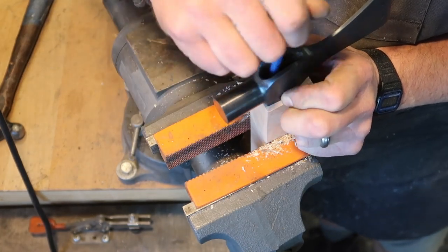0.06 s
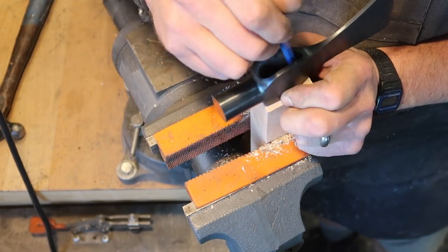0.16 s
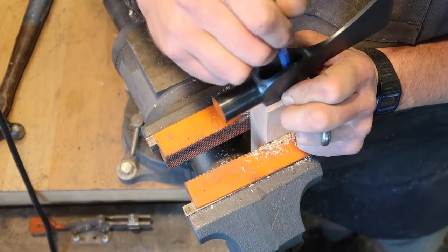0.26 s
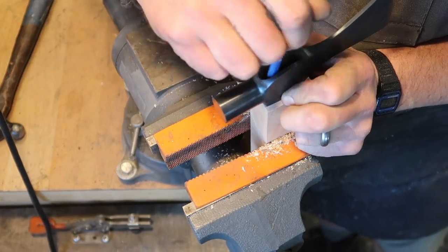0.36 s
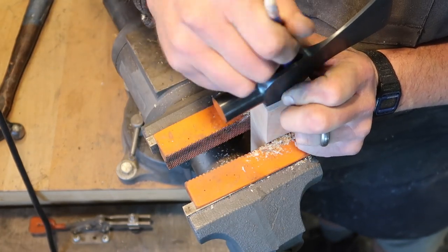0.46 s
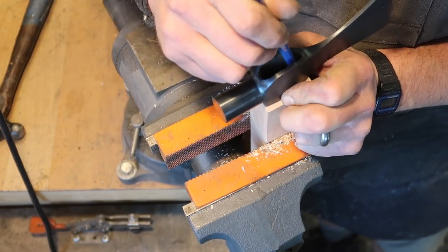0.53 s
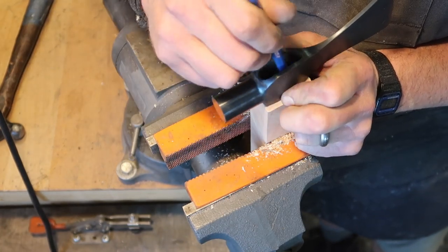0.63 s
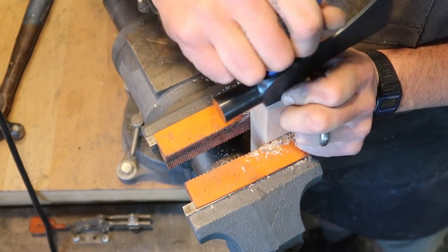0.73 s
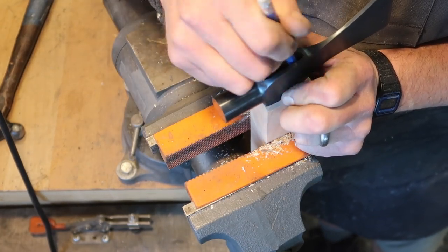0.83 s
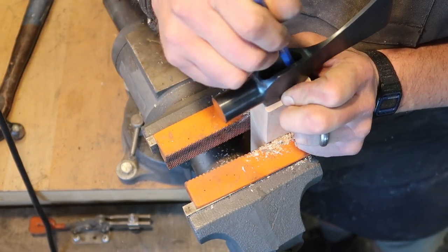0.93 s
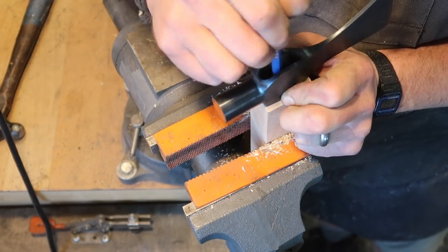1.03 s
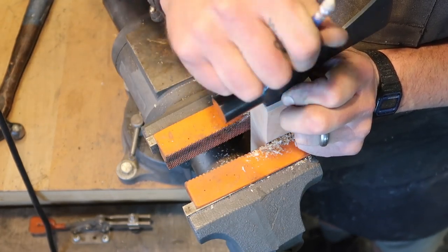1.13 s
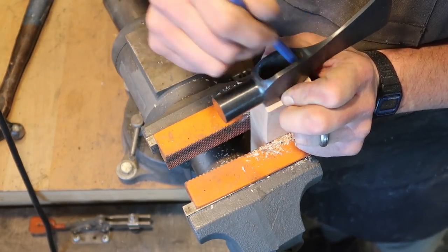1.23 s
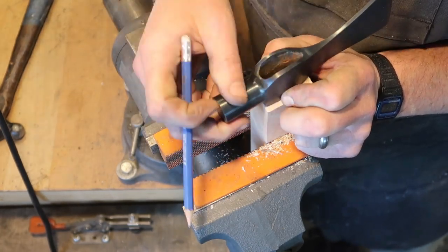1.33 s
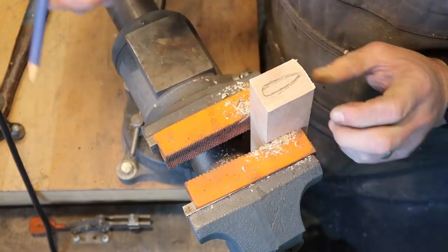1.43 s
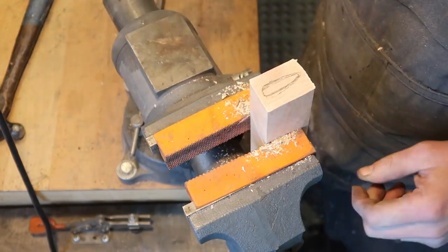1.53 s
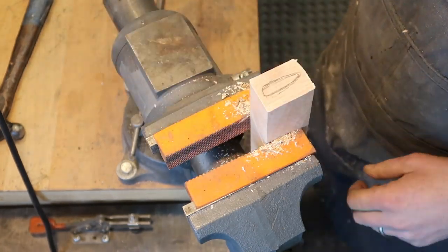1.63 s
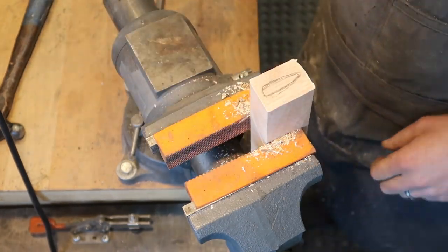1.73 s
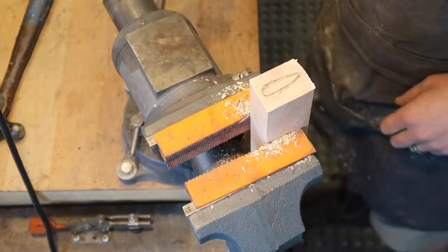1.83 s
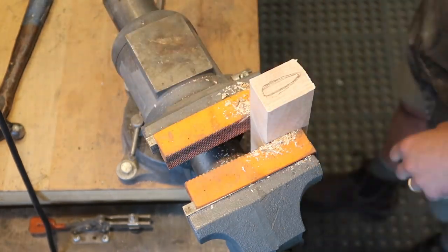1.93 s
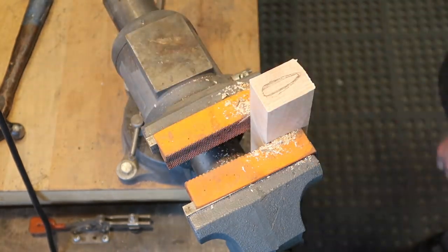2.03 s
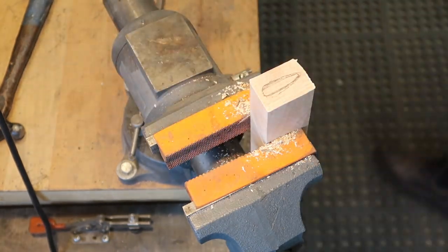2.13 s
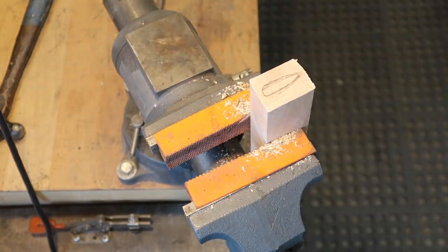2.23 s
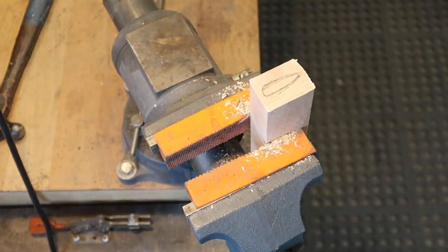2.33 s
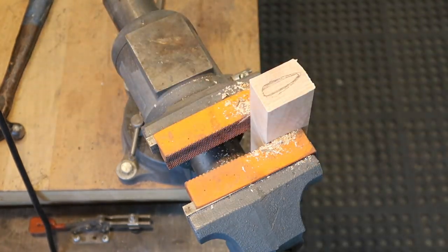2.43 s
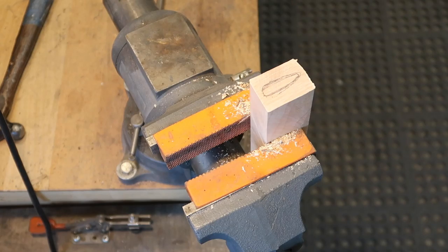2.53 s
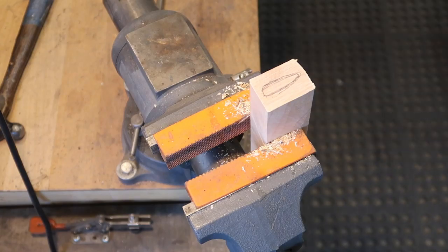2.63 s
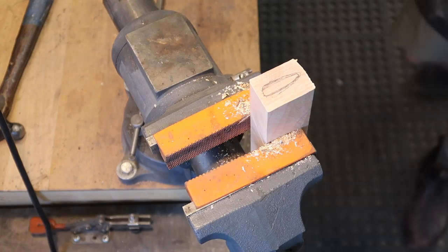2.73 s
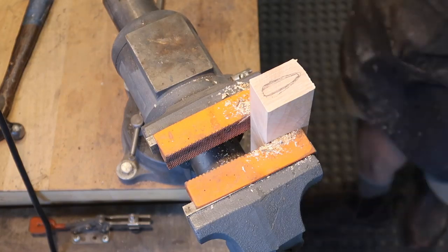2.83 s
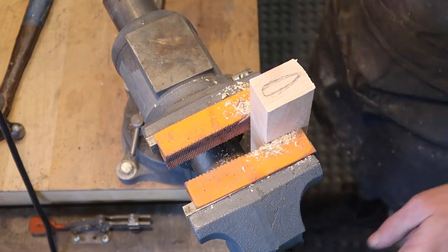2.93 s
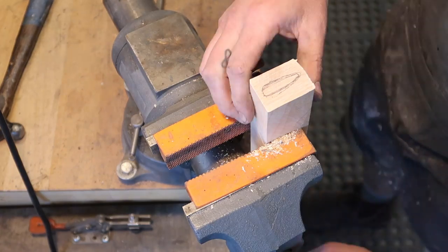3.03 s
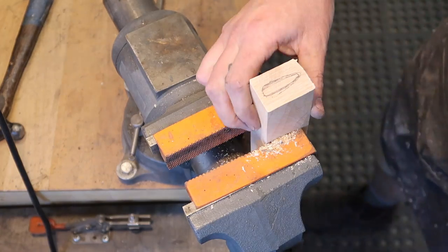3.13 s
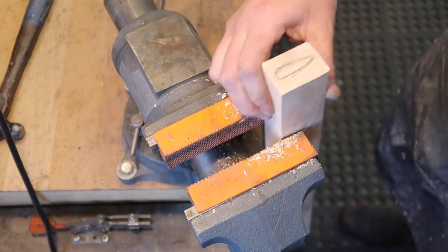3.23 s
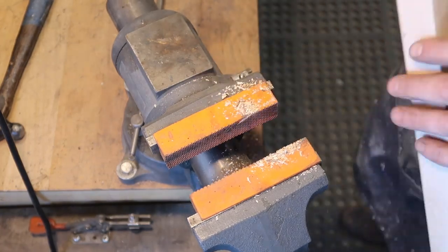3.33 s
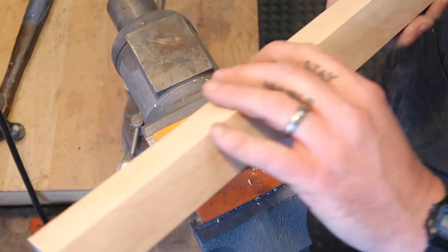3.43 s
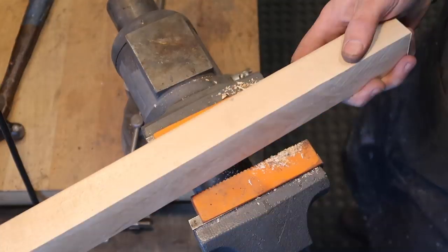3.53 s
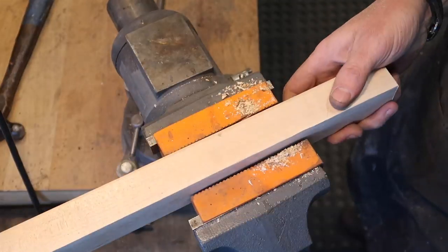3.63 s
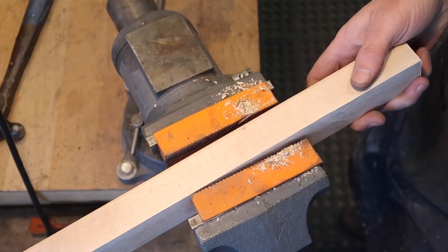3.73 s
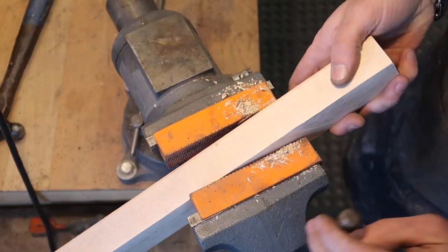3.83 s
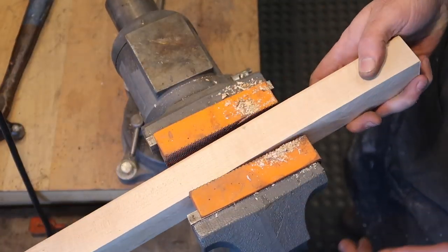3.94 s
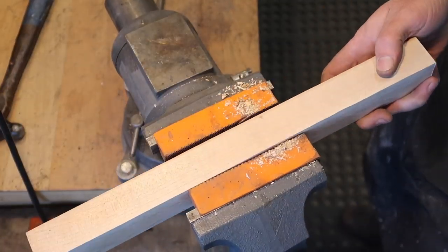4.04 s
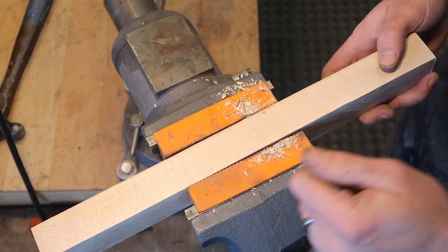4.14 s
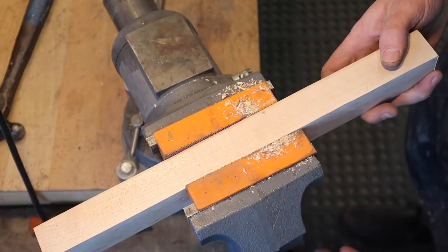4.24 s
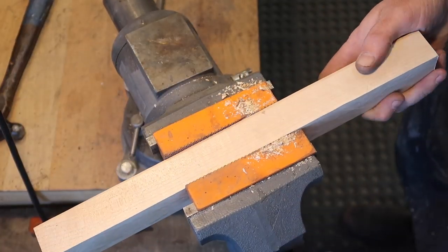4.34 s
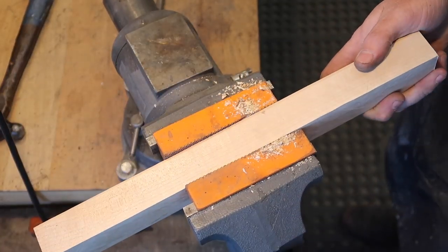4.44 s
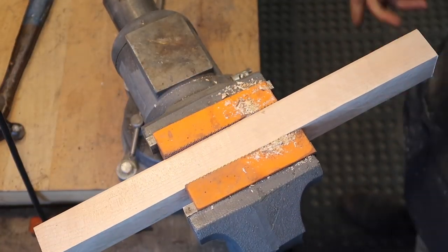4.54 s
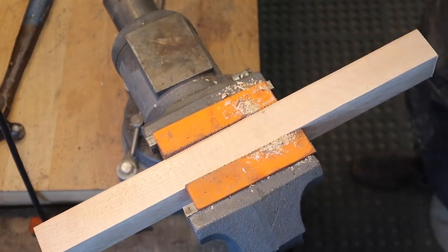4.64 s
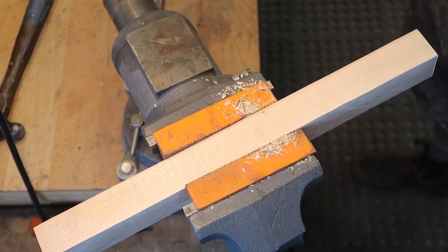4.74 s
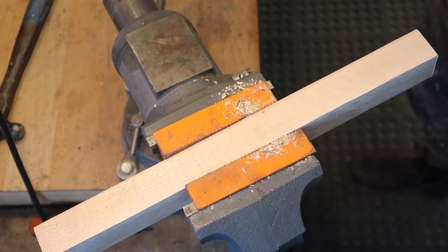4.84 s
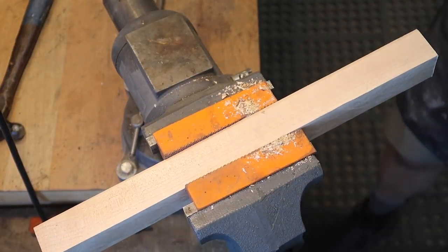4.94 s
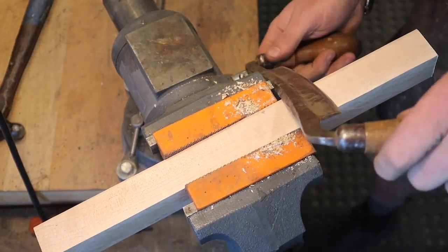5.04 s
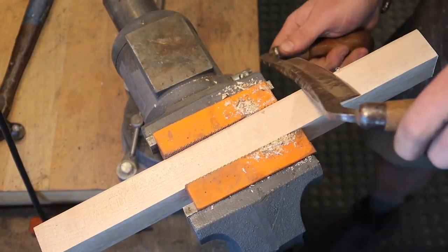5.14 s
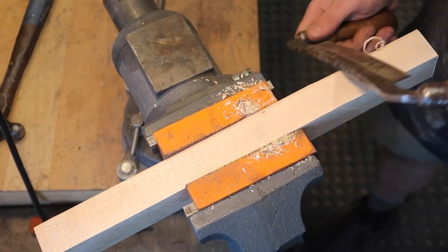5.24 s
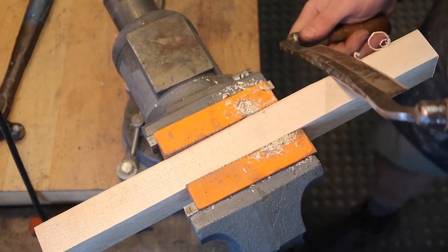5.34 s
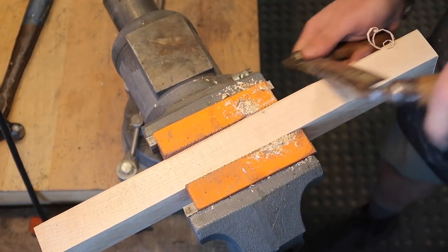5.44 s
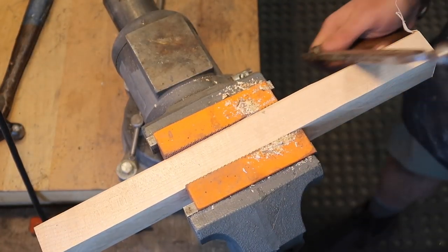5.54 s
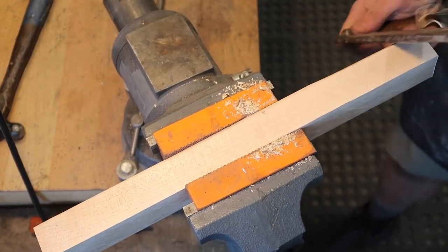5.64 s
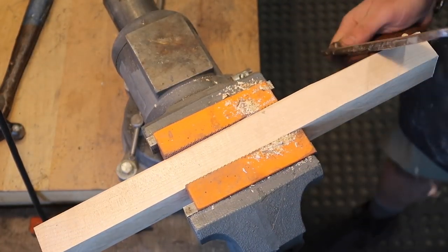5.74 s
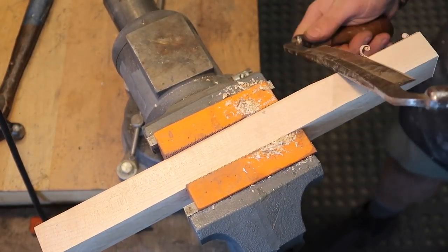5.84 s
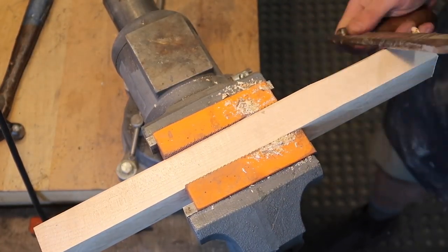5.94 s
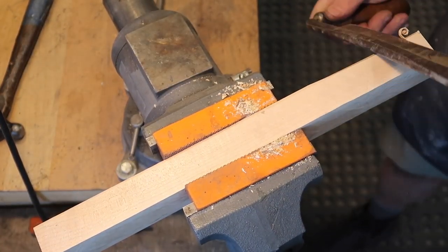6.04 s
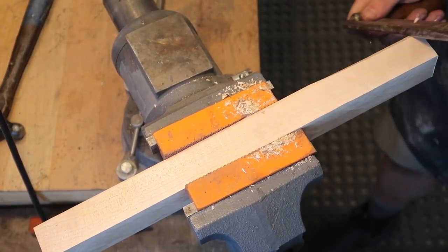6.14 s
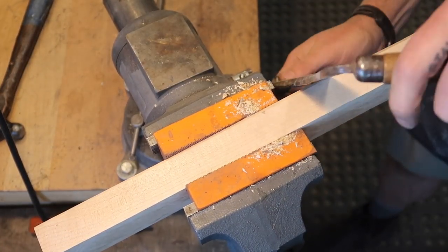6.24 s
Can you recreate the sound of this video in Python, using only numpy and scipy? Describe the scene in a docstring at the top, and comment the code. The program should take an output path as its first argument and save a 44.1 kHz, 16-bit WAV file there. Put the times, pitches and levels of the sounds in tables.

```python
"""Axe work at a bench

A pencil traces the eye of a steel axe head, its stick-slip friction exciting the hollow. The head is put
down and rings in its free modes until a hand damps it. A wooden blank is taken out, laid along the vise
and clamped; a hand tool then bites its edge in fast strokes that force the bench into vibration.
A phone close by hears it all in stereo, over the soft hum of the room."""
import sys
import numpy as np
from scipy import signal
from scipy.fft import rfft, irfft
from scipy.io import wavfile

SR = 44100
rng = np.random.default_rng(int(sys.argv[2]) if len(sys.argv) > 2 else 0)


def unload_wav(signal):
    """Save mono or channel-first audio to the path in sys.argv[1] as 16-bit WAV at rate SR, clipped to [-1, 1]."""
    wavfile.write(
        sys.argv[1],
        SR,
        np.round(np.clip(np.atleast_2d(signal).T, -1, 1) * 32767).astype(np.int16),
    )


N = 276948
T = np.arange(N) / SR
SPAN = 8192  # samples in one contact sound

# Spectrum of the room air: frequency_hz, relative_db
ROOM_SPECTRUM = [(25, -2), (100, 0.5), (400, -8.5), (900, -17), (2300, -20), (11000, -36), (15800, -54)]
# Hands, cloth and tool dragging between the hits: time_s, level_db
DRAG_LEVELS = [(0, -67.5), (2.3, -63.5), (4, -66.5), (4.5, -61), (5.05, -64), (5.22, -57), (5.3, -44),
               (5.39, -54.5), (5.46, -45.5), (5.65, -48), (6.28, -54)]
# Soft brushes of hand and cloth: middle_s, level_db
CLOTH_BRUSHES = [(2.356, -59.5), (2.774, -55), (3.853, -58.5), (3.915, -64.5)]
# Pencil scratches in the steel eye: start_s, level_db, pitch_hz
PENCIL_SCRATCHES = [(0.0552, -41.5, 2650), (0.086, -47.5, 1950), (0.124, -61.5, 1860), (0.172, -50, 2200),
                    (0.2, -45, 2670), (0.229, -48, 2070), (0.239, -47, 1610), (0.454, -61, 2230),
                    (0.479, -49, 2470), (0.489, -44, 2480), (0.4962, -32.5, 2400), (0.51, -46, 2300),
                    (0.539, -52, 1670), (0.5757, -44.5, 2620), (0.8346, -47.5, 2240), (0.89, -41.5, 2090),
                    (0.922, -42, 2540), (1.1653, -45, 2160), (1.2101, -51, 2280), (1.253, -43.5, 1830),
                    (1.259, -40.5, 2140), (1.2918, -46, 2240), (1.3334, -45.5, 2540)]
# Dry sweeps of the pencil round the eye: middle_s, half_length_s, level_db
PENCIL_SWEEPS = [(0.153, 0.051, -74), (0.487, 0.09, -68), (0.842, 0.03, -59.5), (1.24, 0.078, -64)]
# Faint singing of the steel after some scratches: peak_s
EYE_RING_TIMES = [.066, 0.189, 0.587, 0.929, 1.262, 1.34]
# Shudders of the vise under a push: middle_s, half_length_s, level_db
VISE_SHUDDERS = [(0.925, 0.016, -47.5), (3.73, 0.088, -49), (5.314, 0.028, -29), (5.463, 0.021, -25),
                 (5.541, 0.034, -33)]
# Resonances of the bench, the blank and its edge: centre_hz, width_hz, gain_db
BENCH_MODES = [(67.5, 56, -13.5), (108.5, 40.6, 0), (157.5, 44, -9.5), (224.8, 102, -4.5)]
BLANK_MODES = [(332.4, 146, 3), (520.4, 214, 5), (768, 220, -1), (1124, 430, -2), (1642, 460, -6.5)]
EDGE_MODES = [(1888, 930, 10), (2267, 730, 12), (2926, 590, 9), (3600, 1160, 2), (4540, 1260, -1),
              (5090, 1750, -3.5), (9150, 3800, -28.5), (12900, 2000, -31.5)]
# Knocks of wood and steel on vise and bench: start_s, bench_db, blank_db, edge_db, spot_hz, fall_s
HANDLING_KNOCKS = [(1.77, -65, -25.5, -41, 433, 0.013), (1.8214, -25.5, -13, -32.5, 840, 0.005),
                   (1.9, -53, -34, -24.5, 3200, 0.0057), (2.1646, -42, -41.5, -55.5, 387, 0.017),
                   (2.8562, -27.5, -15.5, -28, 1260, 0.0035), (2.884, -50, -39.5, -40.5, 3330, 0.025),
                   (2.9402, -45, -42, -38.5, 2470, 0.0095), (3.036, -34, -33, -42, 490, 0.0045),
                   (3.3901, -47.5, -44, -49, 990, 0.025), (4.3011, -42.5, -38.5, -40.5, 980, 0.0088),
                   (4.797, -31.5, -36, -37.5, 2960, 0.019), (5.13, -29.5, -30.5, -41, 1760, 0.013),
                   (5.2586, -30.5, -27.5, -18.5, 2570, 0.0067), (6.183, -38, -20, -18.5, 3900, 0.0029)]
# Sliding contacts: peak_s, blank_db, edge_db, spot_hz, rise_s
HANDLING_SCUFFS = [(1.784, -23.5, -27.5, 445, 0.012), (1.9468, -57.5, -49.5, 1260, 0.019),
                   (2.848, -28.5, -50, 880, 0.0032), (2.8951, -39, -49, 472, 0.015),
                   (3.26, -51.5, -56.5, 1020, 0.027), (3.3346, -30, -37.5, 750, 0.017),
                   (3.529, -50, -53, 940, 0.021), (3.656, -47, -55.5, 1160, 0.007),
                   (3.732, -47.5, -60.5, 365, 0.0093), (4.0609, -49.5, -69, 1060, 0.014),
                   (4.4322, -41, -47.5, 1940, 0.023), (4.5007, -34, -42, 1910, 0.011),
                   (4.6449, -42.5, -47.5, 2270, 0.017), (4.758, -45.5, -47, 1010, 0.018),
                   (4.969, -82, -51, 3160, 0.014), (5.114, -40.5, -56, 342, 0.0058)]
# Blows on the axe head: peak_s, level_db, hardness_db_per_octave, length_s, nodal_mode_hz
AXE_BLOWS = [(1.781, -39.5, 1, 0.0089, 6160), (1.821, -40.5, -14, 0.0033, 7230)]
# Free modes of the axe head: pitch_hz, gain_db, t60_s
AXE_MODES = [(3792, -2, 0.42), (6180, 14.5, 0.19), (7200, 1.5, 0.044), (9530, -14, 0.088),
             (11690, -22, .055), (14200, -21, .05), (14800, -18, .045)]
# Chinks of small steel parts of the vise: peak_s, pitch_hz, level_db, width_hz
VISE_CHINKS = [(3.406, 4360, -58.5, 90), (3.726, 4390, -63, 90), (4.299, 8660, -55.5, 298)]
# Bites of the tool: peak_s, level_db, edge_over_level_db, rise_s, fall_s
TOOL_STROKES = [(5.3, -42.5, -12, 0.031, 0.04), (5.3332, -36, -22.5, 0.0088, 0.013),
                (5.415, -34, -27, 0.0065, 0.038), (5.4611, -35, -21.5, 0.015, 0.038),
                (5.545, -24.5, -11.5, 0.0063, 0.013), (5.6359, -28, -13.5, 0.0059, 0.013),
                (5.7255, -22.5, -8, 0.01, 0.012), (5.787, -25.5, 1, 0.0034, 0.01),
                (5.823, -33, -10.5, 0.0025, 0.013), (5.9207, -27, -27.5, 0.018, 0.012),
                (6.004, -28.5, -15.5, 0.0028, 0.02), (6.019, -23, -12, 0.0026, 0.0053),
                (6.1172, -28, -12.5, 0.015, 0.015), (6.173, -30.5, -1.5, 0.015, 0.023),
                (6.2197, -24.5, -12.5, 0.0043, 0.0046), (6.2765, -30, 0.5, 0.0012, 0.0023)]
# Two steel resonances of the tool and the broad hiss of the shaving: centre_hz, width_hz, gain_db
BLADE_MODES = [(3830, 140, 3), (5690, 340, 7), (9200, 14000, -16)]
# Gain into the stereo side signal, for near sound and for room air: frequency_hz, gain_db
NEAR_SIDE_GAIN = [(200, -89.5), (1300, -18.5), (2400, -19.5), (4400, -5), (9000, 1.5)]
AIR_SIDE_GAIN = [(60, -27.5), (200, -5), (400, 1.5)]


def undb(db):
    """Amplitude grows tenfold per 20 dB."""
    return 10 ** (np.asarray(db) / 20)


def unit(x):
    """Normalisation to an RMS of 1."""
    return x / np.sqrt(np.mean(x ** 2))


def colour(x, points):
    """Spectral shaping through (frequency_hz, gain_db) points."""
    hz, db = np.transpose(points)
    gain_db = np.interp(np.log(np.fft.rfftfreq(N, 1 / SR) + 1), np.log(hz), db)
    return irfft(rfft(x) * undb(gain_db), N)


def ring(x, hz, width_hz):
    """A second-order resonator, gain 1 at its centre."""
    return signal.lfilter(*signal.iirpeak(hz, hz / width_hz, SR), x)


def steep(x, hz, width_hz):
    """Two equal resonators in cascade give steeper flanks."""
    return ring(ring(x, hz, width_hz), hz, width_hz)


def body(modes):
    """Modal superposition: the frequency response of resonances of alternating sign."""
    tick = signal.unit_impulse(SPAN)
    return rfft(sum((-1) ** k * undb(db) * steep(tick, hz, width)
                    for k, (hz, width, db) in enumerate(modes)))


def grit(spread_db, size=N):
    """Stick-slip friction: noise whose strength jumps every millisecond."""
    step = SR // 1000
    jumps = np.repeat(undb(spread_db * rng.standard_normal(size // step + 1)), step)[:size]
    return unit(jumps * rng.standard_normal(size))


def walk(rate_hz):
    """Low-passed noise wanders slowly, with an RMS of 1."""
    lowpass = signal.butter(2, rate_hz / 2, fs=SR, output="sos")
    return unit(signal.sosfilt(lowpass, rng.standard_normal(N)))


def swell(middle_s, half_s):
    """A flat-topped, super-Gaussian envelope."""
    return np.exp(-((T - middle_s) / half_s) ** 4)


def ping(peak_s, hz, db, rise_s, fall_s, width_hz):
    """A narrow resonance driven by noise gives a brief, rattly steel tone."""
    exponent = np.where(T < peak_s, (T - peak_s) / rise_s, (peak_s - T) / fall_s)
    return undb(db) * np.exp(exponent.clip(-50)) * unit(ring(rng.standard_normal(N), hz, width_hz))


def excite(out, peak_s, db, rise_s, fall_s, response, rough_db, blow):
    """Forced response of a body to slips round one impulse, added to a track padded by SPAN each end."""
    lead = SPAN // 4
    t = (np.arange(SPAN) - lead) / SR
    rise_s, fall_s = max(rise_s, 3e-4), max(fall_s, 5e-4)
    force = np.exp(np.where(t < 0, -(t / rise_s) ** 2, -t / fall_s)) * grit(rough_db, size=SPAN)
    # the impulse carries blow squared times the energy of the slips
    force[lead] = blow * np.sqrt(np.sum(force ** 2)) * np.sign(force[lead])
    sound = irfft(rfft(force) * response, SPAN)
    sound *= undb(db) * np.sqrt((rise_s + fall_s) / 2 * SR / np.sum(sound ** 2))
    start = int(peak_s * SR) - lead
    out[start + SPAN:start + 2 * SPAN] += sound


def room_tone(level_db=-59.5):
    """Air and far machinery make broadband noise, its lows slowly modulated in amplitude."""
    air = unit(colour(rng.standard_normal(N), ROOM_SPECTRUM)) * undb(level_db)
    lows = signal.lfilter(*signal.butter(1, 1500, fs=SR), air)
    return air + lows * (undb(3.4 * walk(4.3)) - 1)


def drag():
    """Sliding friction drives the modes of wood and blade unevenly; cloth brushes on top."""
    times, rub_db = np.transpose(DRAG_LEVELS)
    response = body(BLANK_MODES) + undb(-16.5) * body(EDGE_MODES) + undb(-29) * body(BLADE_MODES)
    rub = unit(signal.fftconvolve(grit(1.9), irfft(response, SPAN))[:N])
    rub *= undb(np.interp(T, times, rub_db) + 2.0 * walk(27.5))
    cloth = unit(steep(grit(3.0), 1370, 2200))
    return rub + cloth * sum(undb(db) * swell(s, 0.012) for s, db in CLOTH_BRUSHES)


def pencil(lift_s=1.36):
    """Stick-slip of graphite hisses, excites the cavity of the eye and wakes the lowest steel mode."""
    scratches, dust = np.zeros(N + 2 * SPAN), body([(10200, 20000, 0)])
    for s, db, hz in PENCIL_SCRATCHES:
        fall_s = 0.0049 * 2 ** (-(db + 48) / 21)  # 21 dB louder is half as long
        eye = body([(hz, 330, 0), (2000, 1500, -7)])
        excite(scratches, s - .001, db, 0.88 * fall_s, fall_s, eye, rough_db=4, blow=.25)
        excite(scratches, s, db - 28, .01, .016, dust, rough_db=2, blow=0)
    slips = grit(4.5)
    sweeps = unit(steep(slips, 2100, 1440)) * undb(4.3 * walk(38))
    sweeps *= sum(undb(db) * swell(s, half_s) for s, half_s, db in PENCIL_SWEEPS)
    hiss = unit(steep(slips, 13000, 5000)) * undb(-89.5 + 5.8 * walk(25)) * (T < lift_s)
    singing = sum(ping(s, AXE_MODES[0][0], db=-60.5, rise_s=.004, fall_s=.02, width_hz=21)
                  for s in EYE_RING_TIMES)
    return scratches[SPAN:SPAN + N] + hiss + sweeps + singing


def bench_sway(bite_rows, sway_db=-13.5, energy_decay_s=0.064):
    """Low resonances: the vise shudders under a push; the bench sways with it and after each bite."""
    energy = sum(undb(2 * bench_db) * (T > s) * np.exp(-np.abs(T - s) / energy_decay_s)
                 for s, bench_db, *_ in bite_rows)
    push = sum(undb(db) * swell(s, half_s) for s, half_s, db in VISE_SHUDDERS)
    wobble = unit(steep(rng.standard_normal(N), hz=30, width_hz=80))
    shudder = unit(steep(rng.standard_normal(N), hz=95.8, width_hz=35))
    return wobble * undb(sway_db) * (np.sqrt(energy) + push) + shudder * push


def shifted(modes, scatter=.06):
    """Boundary conditions vary with grip and place, shifting the modes from touch to touch."""
    return [(hz * (1 + scatter * rng.standard_normal()), width, db) for hz, width, db in modes]


def contacts(rows, rough_db, least_blow):
    """Modal excitation: a contact thumps the bench, rings the blank and clicks at its edge."""
    out, bench = np.zeros(N + 2 * SPAN), body(BENCH_MODES)
    octaves = np.log2(1 + np.fft.rfftfreq(SPAN, 1 / SR) / 4000)
    for s, bench_db, blank_db, edge_db, spot_hz, rise_s, fall_s in rows:
        blow = max(np.exp(-rise_s / 0.002), least_blow)  # a sudden contact is more impulsive
        blank, edge = body(shifted(BLANK_MODES)), body(shifted(EDGE_MODES))
        # the touched spot favours modes near one pitch; a higher one clicks brighter
        spot = 1 + body([(spot_hz, 0.56 * spot_hz, 2)])
        bright = undb(4.5 * np.log2(spot_hz / 1500) * octaves)
        # slow bodies peak late, so their force leads the loudest moment
        excite(out, s - .005, bench_db, rise_s, fall_s, bench, rough_db=0, blow=.8)
        excite(out, s - .0022, blank_db, rise_s, fall_s, blank * spot, rough_db, 1.3 * blow)
        excite(out, s - .001, edge_db, rise_s, fall_s, edge * spot * bright, rough_db, 0.55 * blow)
    return out[SPAN:SPAN + N]


def handling(scuff_thump_limit_db=-34.5):
    """Impact forces rise abruptly in knocks; friction forces swell and let go in scuffs."""
    knocks = [(*knock, 0.057 * fall_s, fall_s) for *knock, fall_s in HANDLING_KNOCKS]
    scuffs = [(s, min(db - 2.5, scuff_thump_limit_db), db, edge_db, spot_hz, rise_s, 0.85 * rise_s)
              for s, db, edge_db, spot_hz, rise_s in HANDLING_SCUFFS]
    return contacts(knocks + scuffs, rough_db=3.1, least_blow=0)


def axe_blow(peak_s, level_db, hardness_db, length_s, nodal_hz, node_db=-21, rattle_db=-9):
    """Steel modes rattle, then decay freely; hardness favours high ones, one hit at a node barely rings."""
    out, pulse = 0, np.exp(-((T - peak_s) / length_s) ** 2)
    force = pulse * rng.standard_normal(N)
    for hz, mode_db, t60_s in AXE_MODES:
        envelope = np.where(T < peak_s, pulse, undb(-60 * np.maximum(T - peak_s, 0) / t60_s))
        tone = np.sin(2 * np.pi * (hz * T + rng.random())) * envelope
        rattle = steep(force, hz, hz / 10)
        at_node = abs(np.log2(hz / nodal_hz)) < 1 / 20
        gain = undb(level_db + mode_db + hardness_db * np.log2(hz / AXE_MODES[0][0]))
        out += gain * (undb(node_db * at_node) * tone + undb(rattle_db) * rattle / np.abs(rattle).max())
    return out


def axe_head(held_s=1.888, damping_s=0.014):
    """Scraped down, then knocked, the head vibrates freely until a hand adds damping."""
    return sum(axe_blow(*blow) for blow in AXE_BLOWS) * np.exp(-np.maximum(T - held_s, 0) / damping_s)


def vise_chinks():
    """Small steel parts resonate, with decay times inversely proportional to bandwidth."""
    return sum(ping(s, hz, db, 0.0017, 2.1 / width, width) for s, hz, db, width in VISE_CHINKS)


def tool_bites(shake_db_per_s=-7.5):
    """Cutting forces, as rows for contacts(): the bench shakes less as the tool nears the vise."""
    rows = []
    for s, db, edge_over_db, rise_s, fall_s in TOOL_STROKES:
        bench_db = db + 1.5 + shake_db_per_s * (s - TOOL_STROKES[0][0])
        spot_hz = 1643 * 2 ** (edge_over_db / 16)  # a sharper bite rings higher
        rows.append((s, bench_db, db, db + edge_over_db, spot_hz, rise_s, fall_s))
    return rows


def blade(relative_db=-36.5):
    """Cutting friction excites the steel of the tool faintly, and the shaving hisses."""
    out, response = np.zeros(N + 2 * SPAN), body(BLADE_MODES)
    for s, db, _, rise_s, fall_s in TOOL_STROKES:
        excite(out, s, db + relative_db, rise_s + 0.0047, fall_s + 0.0027, response, rough_db=3, blow=0)
    return out[SPAN:SPAN + N]


def reflections(x, t60_s, cutoff_hz):
    """Reverberation: dense reflections decay exponentially, duller than the direct sound."""
    t = T[:SR // 2]
    pole = np.exp(-2 * np.pi * cutoff_hz / SR)
    dull_noise = signal.lfilter([1], [1, -pole], rng.standard_normal(len(t)))
    tail = unit(dull_noise * undb(-60 * t / t60_s)) / np.sqrt(len(t))
    return signal.fftconvolve(x, tail)[:N]


def scene():
    """Superposition of direct sound, reflections and room air, as mid and side signals."""
    bites = tool_bites()
    # the edge breaks through with a blow at the height of every bite
    work = handling() + contacts(bites, rough_db=3.8, least_blow=0.27)
    work = work + blade() + pencil() + drag() + bench_sway(bites)
    near = work + axe_head() + vise_chinks()
    mid = near + undb(-15.5) * reflections(work, t60_s=0.17, cutoff_hz=1560) + room_tone()
    # near bass is alike at both microphones, treble arrives by different reflections; the air is diffuse
    side = colour(reflections(near, t60_s=0.046, cutoff_hz=16000), NEAR_SIDE_GAIN)
    side += colour(room_tone(), AIR_SIDE_GAIN)
    return np.array([mid + side, mid - side])


def record(dry):
    """Band limiting: the phone cuts the treble above 15.8 kHz."""
    return signal.sosfilt(signal.ellip(8, .2, 70, 15800, fs=SR, output="sos"), dry)


dry = scene()
out = record(dry)
unload_wav(out)
```